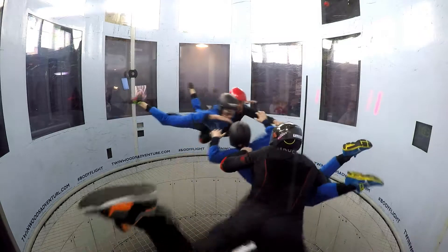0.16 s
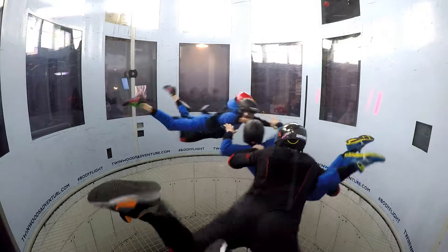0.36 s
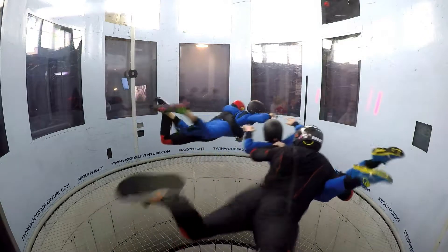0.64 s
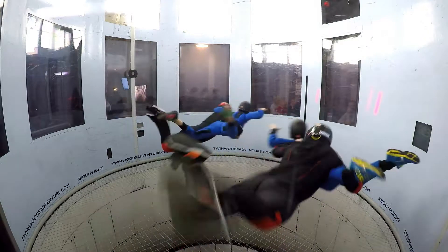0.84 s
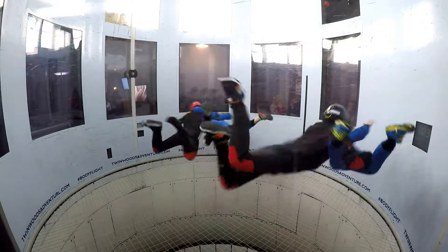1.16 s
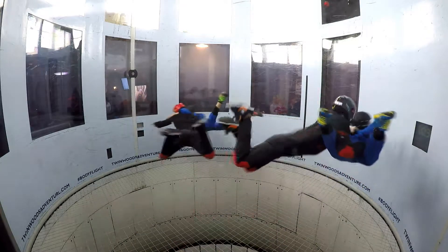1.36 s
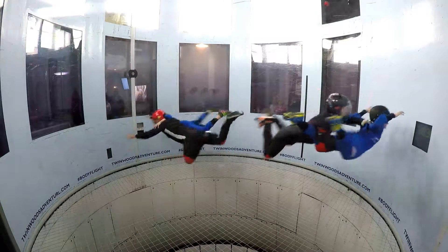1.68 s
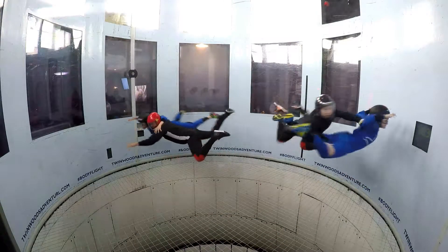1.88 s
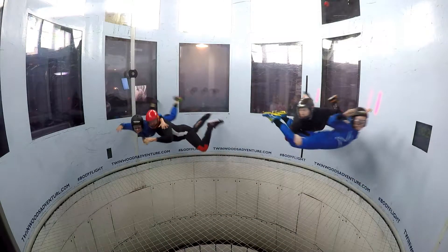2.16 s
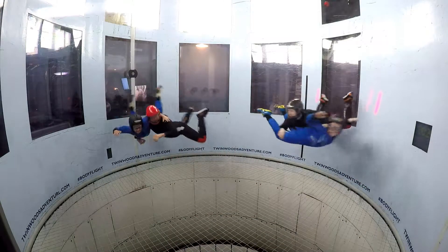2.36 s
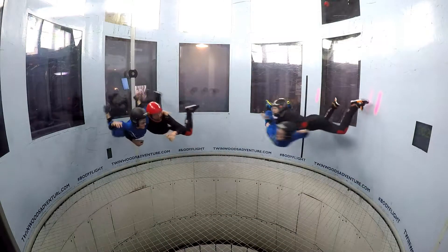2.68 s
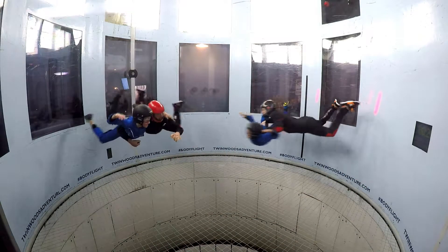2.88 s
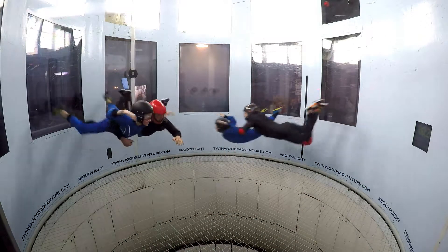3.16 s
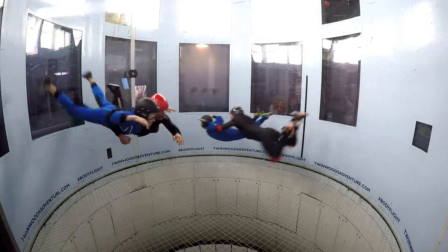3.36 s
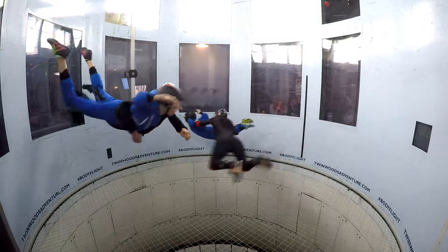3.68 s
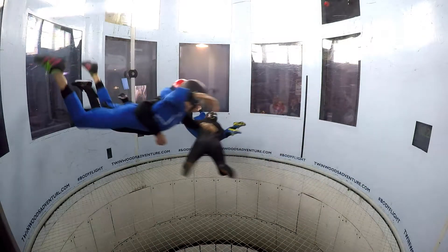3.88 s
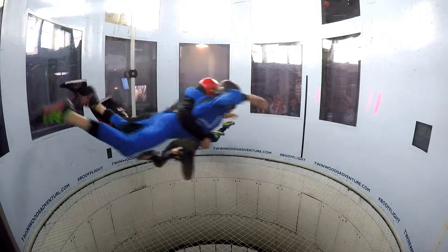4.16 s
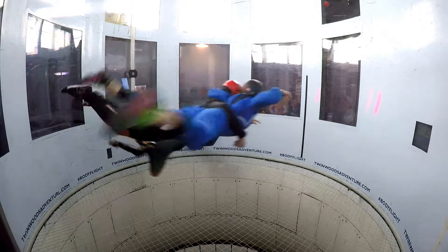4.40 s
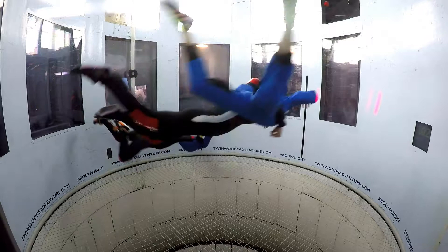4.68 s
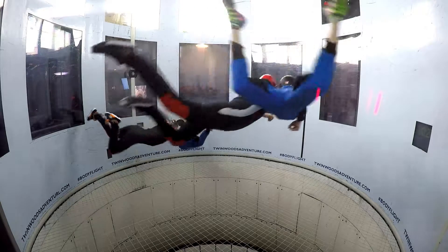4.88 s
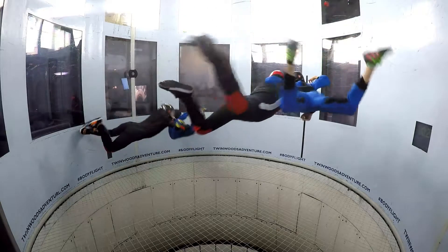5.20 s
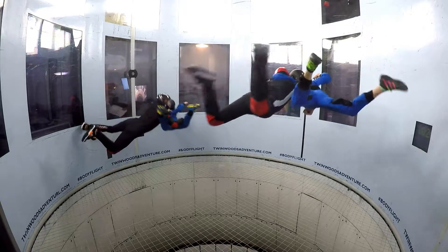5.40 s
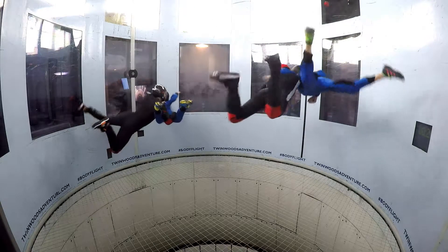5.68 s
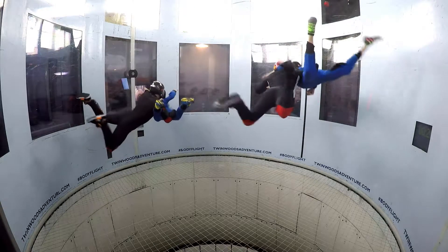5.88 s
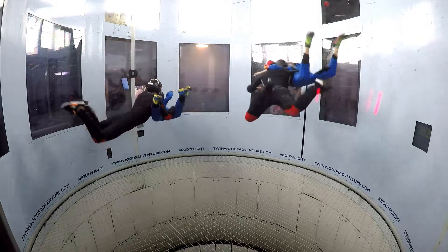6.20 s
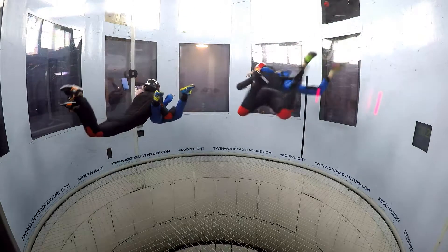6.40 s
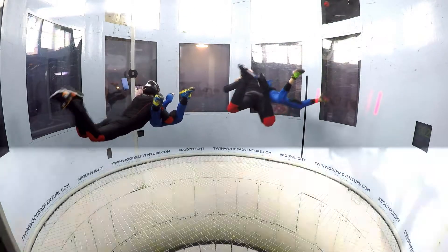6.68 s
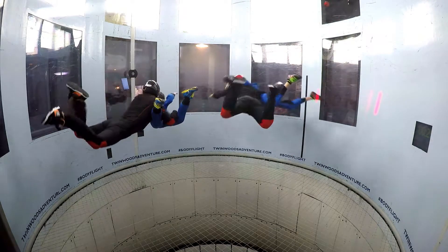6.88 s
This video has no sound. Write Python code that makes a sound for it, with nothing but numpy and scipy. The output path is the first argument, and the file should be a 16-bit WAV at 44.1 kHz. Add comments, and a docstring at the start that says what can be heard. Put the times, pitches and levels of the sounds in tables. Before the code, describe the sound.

Constant low-heavy airflow roar in a round flight chamber, pulsing bass fan hum, fluttering duct rumble and a hollow mid-low drone, no voices.

```python
"""A vertical wind tunnel at flying speed, heard from behind the glass wall of its round chamber for 7 s.
From the start the fans hum near 62 Hz, swelling and fading, over a duct rumble made of resonant noise.
The roar of the air, noise coloured by chamber and wall, runs throughout; one wall panel drones loudly.
Near 4.9 s the rumble sinks and the hum swells; by the end the rumble is back and the drone is strongest.
The recorder adds a faint flickering hiss and 25 tiny high pips a second all the way through."""
import sys
import numpy as np
from scipy import signal
from scipy.fft import rfft, irfft
from scipy.io import wavfile
from scipy.ndimage import uniform_filter1d

SR = 44100
rng = np.random.default_rng(int(sys.argv[2]) if len(sys.argv) > 2 else 0)


def transcribe(signal):
    """Save signal, clipped to [-1, 1], as a 16-bit WAV file at the path in sys.argv[1]."""
    frames = np.atleast_2d(signal).T
    limited = np.clip(frames, -1, 1)
    pcm = np.round(limited * 32767).astype(np.int16)
    wavfile.write(sys.argv[1], SR, pcm)


N = 310905   # length in samples
TIME_S = np.arange(N) / SR
HZ = np.maximum(np.arange(N // 2 + 1) * SR / N, 1)   # frequencies of the spectrum, kept off zero


def from_db(db):
    """Decibels to gain."""
    return 10 ** (np.asarray(db) / 20)


def rms_one(x):
    """Scale a sound to an average strength (rms) of 1."""
    return x / np.sqrt(np.mean(x ** 2) + 1e-20)


def in_time(rows):
    """Join the rows of a table with straight lines in time; gives one curve for each later column."""
    seconds, *columns = np.transpose(rows)
    return [np.interp(TIME_S, seconds, column) for column in columns]


def over_hz(points):
    """Join a few spectrum points, in dB, along a log-frequency axis."""
    hz, db = np.transpose(points)
    return np.interp(np.log(HZ), np.log(hz), db)


def coloured(gain):
    """White noise given a gain at each frequency, then scaled to rms 1."""
    white = rng.standard_normal(N)
    return rms_one(irfft(rfft(white) * gain, N))


def drift(rate_hz):
    """Random wandering of spread 1, weaker above rate_hz and with nothing at or below 1 Hz."""
    return coloured((HZ > 1) / (1 + (HZ / rate_hz) ** 2))


def resonant_noise(modes, steady_s):
    """Turbulence ringing in steep resonances; swells slower than steady_s are evened out."""
    power = 0
    for hz, width, db in modes:
        power = power + from_db(db) ** 2 / (1 + (2 * (HZ - hz) / width) ** 2) ** 2
    noise = coloured(np.sqrt(power))
    size = int(steady_s * SR)
    slow_power = uniform_filter1d(uniform_filter1d(noise ** 2, size), size)
    return rms_one(noise / np.sqrt(slow_power + 0.038))   # the small floor limits the boost


def recorder_hiss():
    """The recorder's own noise: random treble above 3 kHz whose level flickers quickly."""
    # Each row: frequency in Hz, relative level in dB per Hz.
    hiss_spectrum = [(5000, -20), (7500, 0), (12000, -4), (14200, -6), (14300, -12), (15300, -11)]
    level_db = -73 + 1.3 * drift(30.0)
    return from_db(level_db) * coloured(from_db(over_hz(hiss_spectrum)) * (HZ > 3000))


def pips():
    """Short bursts of a high tone at a strict rate, each swelling and fading as a smooth bell."""
    tone_hz, peak_db, width_ms = 8540, -65.5, 3.4   # the width is two standard deviations of the bell
    first_s, period_s = .0255, .04
    # seconds from the middle of the nearest pip
    since = (TIME_S - first_s + period_s / 2) % period_s - period_s / 2
    bell = np.exp(-.5 * (2000 * since / width_ms) ** 2)
    return from_db(peak_db) * bell * np.sin(2 * np.pi * tone_hz * since)


def duct_rumble():
    """Turbulence ringing in the deep resonances of the duct, under a slowly changing level."""
    # Each row: start in seconds, level in dB.
    rumble_level = [(0, -19), (.5, -18), (1.4, -17), (2.1, -17), (3, -16.5), (4.4, -17.5), (4.9, -22.5),
                    (5.5, -21), (6.4, -20), (7.05, -17.5)]
    # Resonances of the duct. Each row: frequency in Hz, width in Hz, relative level in dB.
    rumble_modes = [(10.5, 5, -5.5), (24, 5.1, -5), (31.8, 6, -4), (18, 5, -10)]
    return from_db(in_time(rumble_level)[0]) * resonant_noise(rumble_modes, steady_s=0.3)


def fans():
    """Blade tone, a separate hum at 124.5 Hz and a faint third harmonic; unsteady inflow sways them."""
    # Fan hum. Each row: start in seconds, blade rate in Hz, level in dB, random waver in dB.
    hum_curve = [(0, 63.4, -16.5, 2), (.4, 62.35, -24.5, 2.5), (.85, 61.5, -21, 3), (1.35, 63.43, -28, 6),
                 (1.6, 61.25, -20, 3), (2.1, 61.27, -17.5, 2.5), (2.5, 61.35, -24.5, 2),
                 (3.35, 61.25, -19.5, 3), (3.85, 60.8, -25, 4), (4.1, 61.2, -21, 3), (4.35, 62.25, -24, 2),
                 (4.85, 62.44, -15.5, -0.5), (5.9, 62.6, -16, 1.5), (6.07, 62.55, -21, 2),
                 (6.3, 62.5, -13.5, -0.5), (6.52, 62.9, -20, 2), (7.05, 62.7, -17, 1)]
    # Separate hum near twice the blade rate. Each row: start in seconds, level in dB.
    upper_hum_curve = [(0.0, -47), (0.16, -34.5), (0.8, -39), (1.22, -30), (3.08, -41), (3.16, -31.5),
                       (4.4, -44), (4.5, -31), (5.4, -41), (6.52, -30), (6.99, -39), (7.05, -51)]
    upper_hum_hz, upper_hum_waver_db, third_db = 124.5, 2.5, -39.5

    blade_hz, hum_db, waver_db = in_time(hum_curve)
    phase = 2 * np.pi * np.cumsum(blade_hz) / SR + .12 * drift(2.0)
    hum_db = hum_db + waver_db * np.minimum(drift(8.2), 1)   # the highest chance swings are capped
    hum = from_db(hum_db) * np.sin(phase)

    upper_hum_tone = np.sin(2 * np.pi * upper_hum_hz * TIME_S + 0.67 * drift(1.5))
    upper_hum_db = in_time(upper_hum_curve)[0] + upper_hum_waver_db * np.minimum(drift(3.7), 1)
    upper_hum = from_db(upper_hum_db) * upper_hum_tone

    third_tone = np.sin(3 * phase + rng.uniform(0, 2 * np.pi))   # three times the blade rate
    third = from_db(third_db + 0.6 * drift(1.2)) * third_tone
    return np.sqrt(2) * (hum + upper_hum + third)   # makes the dB levels rms levels


def roar():
    """Broad turbulence noise shaped by the chamber and the wall."""
    # Overall colour of the roar through the wall. Each row: frequency in Hz, relative level in dB per Hz.
    roar_spectrum = [(30, -17), (52, -1), (90, -16), (280, -19), (420, -9), (480, -22), (760, -33.5),
                     (950, -25.5), (1500, -40), (2200, -39), (2400, -49.5), (4900, -48), (5400, -62.5),
                     (8000, -76)]
    # Air modes of the chamber (up) and gaps between them (down).
    # Each row: frequency in Hz, width in Hz (narrowed below), change in dB.
    chamber_modes = [(75.3, 4.8, 5), (91, 6, -1), (100, 7.8, 3), (122, 12, 4.5), (146, 8, -2.5),
                     (188, 12, 7.5), (209, 14, 4), (242.4, 18, 6.5), (294, 7.9, 3.5), (296.6, 10, -7.5)]
    # Wall resonances (up) and cancellations (down), with the same columns.
    wall_modes = [(312.6, 10, 5.5), (313, 5, -4), (470, 6.4, -4.5), (720, 13, 2), (770, 30, -8.5),
                  (2234, 70, -6), (3150, 200, 5), (337, 22, 6), (384, 9.1, -4.5), (397, 13, 5),
                  (433, 11, 3.5), (510, 32, 1.5), (511, 16, 2.5), (582.4, 25, 15), (637.5, 11, 8),
                  (683, 11, 5), (837, 6, -2), (885, 20, 8.5), (1139, 16, -11.5), (1213, 24, -8.5),
                  (1314, 54, 3), (1629, 62, 4.5), (2000, 38, 9), (3740, 210, 5.5), (4040, 150, -3),
                  (4520, 250, 5.5), (5820, 170, 4.5), (6160, 250, 5), (6700, 450, 6), (7350, 320, 4.5)]

    colour_db = over_hz(roar_spectrum)
    for hz, width, db in chamber_modes + wall_modes:
        colour_db = colour_db + db * np.exp(-.5 * ((HZ - hz) / (0.66 * width)) ** 2)
    edges = (HZ > 8) / (1 + (HZ / 9500) ** 8)   # cuts the lowest bass and fades the high treble
    level_db = -21 + .4 * drift(3.9)
    return from_db(level_db) * coloured(from_db(colour_db) * edges)


def panel_drone():
    """Turbulence drives the loudest panel mode, which passes only a narrow band."""
    # Slow level of the drive, before the band filter. Each row: start in seconds, level in dB.
    drone_level = [(0, -17.5), (.37, -23), (.63, -15), (.87, -20), (1.2, -18.5), (1.85, -17.5),
                   (2.12, -23.5), (2.6, -20.5), (2.85, -15.5), (3.12, -19.5), (3.4, -16.5), (4.3, -17.5),
                   (4.8, -19), (5.4, -18.5), (6.1, -20), (6.4, -17), (7.05, -14.5)]
    # Resonances of the panel. Each row: frequency in Hz, width in Hz, relative level in dB.
    drone_modes = [(350.3, 15, 0.15), (365.2, 15, 1.46)]
    # Lower and upper edge of the band that passes, in Hz.
    drone_band = [338, 380]
    drive = from_db(in_time(drone_level)[0]) * resonant_noise(drone_modes, steady_s=0.2)
    band_filter = signal.butter(2, drone_band, "band", fs=SR, output="sos")
    return signal.sosfiltfilt(band_filter, drive)


def scene():
    """Everything that reaches the microphone through the wall, as one channel."""
    return (duct_rumble() + fans() + roar() + panel_drone())[None]


def record(dry):
    """Lift the sound slightly and round its peaks, add hiss and pips, then cut the top."""
    rounded = 1.402 * np.tanh(dry / 1.258)   # quiet sounds gain about 0.9 dB
    wet = rounded + recorder_hiss() + pips()
    cutoff_hz = 15300
    top_cut = signal.ellip(12, .5, 60, cutoff_hz, fs=SR, output="sos")   # .5 dB ripple, 60 dB cut
    return signal.sosfilt(top_cut, wet)


dry = scene()
out = record(dry)
transcribe(out)
```